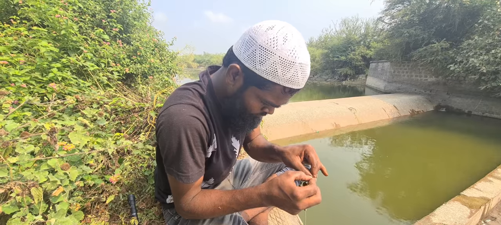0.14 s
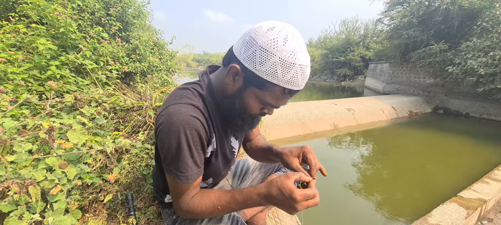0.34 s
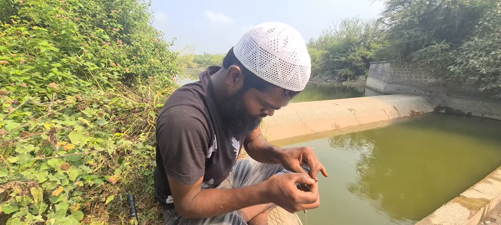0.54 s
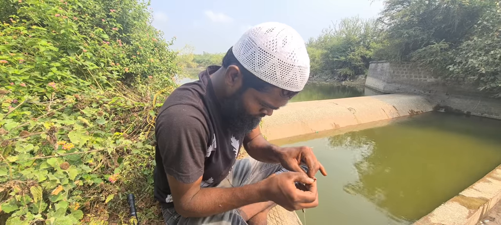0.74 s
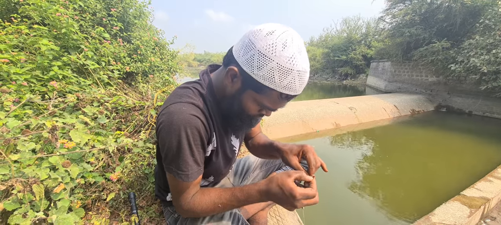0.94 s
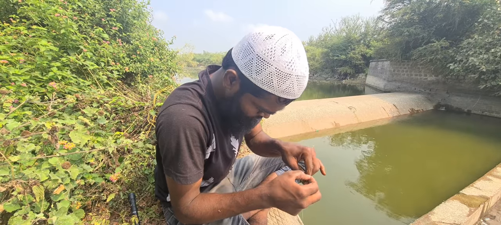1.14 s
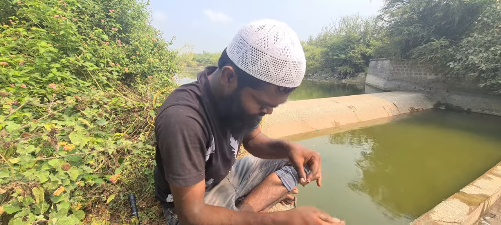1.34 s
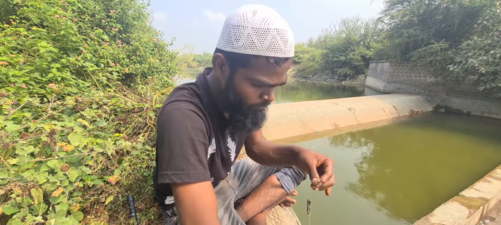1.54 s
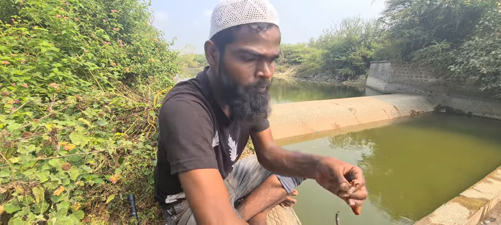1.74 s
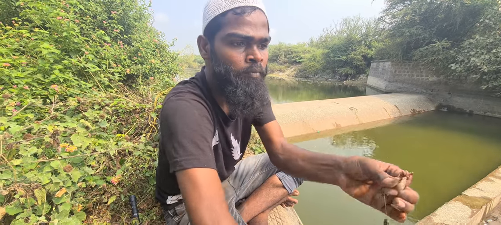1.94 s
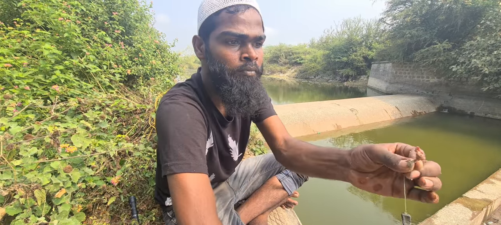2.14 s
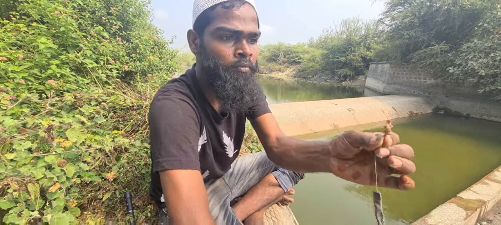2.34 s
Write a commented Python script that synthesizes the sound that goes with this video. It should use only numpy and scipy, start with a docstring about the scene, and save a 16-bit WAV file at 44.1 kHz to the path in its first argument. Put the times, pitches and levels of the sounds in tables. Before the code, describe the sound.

A small bird close by sings quick rising and falling whistles ending on a long, high, quavering note; a farther bird ticks, then gives a fast buzzing trill, echoing off foliage over a soft outdoor rush.

```python
"""Over a soft outdoor rush, a near bird by a canal whistles a quick phrase of rising and falling slurs
that ends in a long, high, quavering note: frequency-modulated sine tones with a light echo.
A farther bird ticks, then trills in see-saw sine sweeps which echoes from the foliage smear into a buzz.
A faint distant whistle is one echoing sine tone; the rush and its thin hiss are filtered noise."""
import sys
import numpy as np
from scipy import signal
from scipy.fft import rfft, irfft
from scipy.io import wavfile
from scipy.ndimage import uniform_filter1d

SR = 44100
rng = np.random.default_rng(int(sys.argv[2]) if len(sys.argv) > 2 else 0)


def inscribe(sig):
    """Save sig as 16-bit PCM at rate SR to the path in sys.argv[1].

    A 1-D sig is mono; a 2-D sig holds one channel per row.
    Samples are clipped to [-1, 1] before scaling.
    """
    pcm = np.round(np.clip(np.atleast_2d(sig).T, -1, 1) * 32767)
    wavfile.write(sys.argv[1], SR, pcm.astype(np.int16))


N = 108045
TIME = np.arange(N) / SR
HZ = np.maximum(np.arange(N // 2 + 1) * SR / N, 1)
NOTE_EDGE_S = .003

# Slowing warble of the near bird's pitch, which widens and then narrows:
# start t/s, end t/s, first rate f/Hz, last rate f/Hz, widest span f/Hz
WARBLE = (.083, .262, 123, 68, 680)


def from_db(db):
    """Level to amplitude: 20 dB is a factor of ten."""
    return 10 ** (np.asarray(db) / 20)


def rms_one(x):
    """Normalisation: division by the root mean square gives unit rms."""
    return x / np.sqrt(np.mean(x ** 2) + 1e-20)


def drift(rate):
    """Low-pass noise: two equal poles at the rate in Hz leave a smooth random signal with spread 1."""
    r = np.exp(-2 * np.pi * rate / SR)
    noise = rng.standard_normal(2 * N)
    settled = signal.lfilter([1], [1, -2 * r, r * r], noise)[N:]
    return rms_one(settled)


def curve(x, points):
    """Linear interpolation: the value at x of a two-column table, held level beyond its ends."""
    return np.interp(x, *np.transpose(points))


def colour(x, points):
    """Spectral filtering: each frequency is weighted by an (f/Hz, level/dB) curve over log frequency."""
    hz, db = np.transpose(points)
    gain = from_db(np.interp(np.log(HZ), np.log(hz), db))
    return irfft(rfft(x) * gain, N)


def gate(start, end, edge):
    """Amplitude windowing: one between start and end, with linear fades over the edge time."""
    return np.clip(np.minimum(TIME - start, end - TIME) / edge + .5, 0, 1)


def foliage(x, t60):
    """Diffuse scattering: leaves and banks return dense echoes that decay 60 dB in t60 s; unit energy."""
    build_s = .008
    t = TIME[:SR]
    echoes = rng.standard_normal(SR) * from_db(-60 * t / t60) * (1 - np.exp(-t / build_s))
    return signal.fftconvolve(x, echoes / np.sqrt(np.sum(echoes ** 2)))[:N]


def air():
    """Broadband noise: a low, almost centred, wavering mid-side rush with a thin centred hiss above it."""
    rush_db, waver_db, waver_hz = -53, 2.01, 7.7
    # Spectrum shape of the low rush: f/Hz, relative level per Hz/dB
    rush_spectrum = [(25, -22), (110, -29), (170, -10), (280, 2), (480, -0.5), (750, -4), (1300, -8),
                     (2200, -17), (3500, -31.5)]
    # Stereo width of the rush: f/Hz, side minus mid level/dB
    side_level = [(70, 3), (125, -2), (250, -22), (500, -20), (1100, -7), (4000, -24)]
    # Spectrum shape of the hiss: f/Hz, relative level per Hz/dB
    hiss_spectrum = [(1200, -8), (2300, -0.5), (4000, -0.5), (7000, 5), (9500, -3.5), (12000, -6),
                     (13500, -25), (15300, -39)]
    # Course of the hiss: t/s, level/dB
    hiss_level = [(0, -50.5), (1.15, -48.5), (2.12, -48.5), (2.3, -52)]

    mid, side, hiss = rng.standard_normal((3, N))
    mid = rms_one(colour(mid, rush_spectrum))
    side = colour(rms_one(colour(side, rush_spectrum)), side_level)
    left_right = np.array([mid + side, mid - side])
    rush = from_db(rush_db + waver_db * drift(waver_hz)) * left_right
    return rush + from_db(curve(TIME, hiss_level)) * rms_one(colour(hiss, hiss_spectrum))


def flutter(start, end, first_rate, last_rate, span):
    """Frequency modulation: a span in Hz that widens then narrows, and the running count of swings."""
    u = np.clip((TIME - start) / (end - start), 0, 1)
    rate = (first_rate + (last_rate - first_rate) * u) * (1 + .025 * drift(20))
    swing_span = span * 2 * np.sqrt(u * (1 - u))
    return swing_span, np.cumsum(rate * (TIME > start)) / SR


def pitch_swings():
    """Modulation waveform, in Hz: the warble is a sine, the quaver a row of arches with pointed dips."""
    jitter_from_s, jitter_spread_hz = 1.128, 148   # the long high note turns unsteady
    # Quaver of the last note: start t/s, end t/s, first rate f/Hz, last rate f/Hz, widest span f/Hz
    quaver_course = (1.2035, 1.43, 46, 46, 1750)

    span, turns = flutter(*WARBLE)
    warble = span / 2 * np.sin(2 * np.pi * turns)
    span, turns = flutter(*quaver_course)
    arches = np.abs(np.sin(np.pi * turns)) - 2 / np.pi   # zero on average
    jitter = jitter_spread_hz * (TIME > jitter_from_s) * drift(133)
    return warble, span * arches + jitter


def near_bird():
    """Instantaneous frequency: its running sum is the phase of whistles that glide, warble and quaver."""
    undertone_db = -31   # an octave down, relative to the long high note
    scatter_db, t60_s = -13.5, .36   # scatter relative to the direct song
    warble_swell_db = 5   # the warble is louder at the top of each swing
    # Notes of the phrase, one curve each, some overlapping as two voices: t/s, f/Hz, level/dB
    phrase = [
        [(.048, 2338, -45.5), (.085, 2900, -39.5), (.11, 2794, -42), (.15, 3445, -34), (.19, 3277, -34),
         (.232, 4060, -27), (.27, 4485, -23), (.285, 4300, -23.5), (.301, 3500, -21.5), (.31, 2560, -48)],
        [(.429, 3393, -32.5), (.433, 4867, -25), (.446, 3020, -36), (.464, 2430, -43.5)],
        [(.456, 5220, -33), (.464, 4420, -33), (.468, 3750, -22.5), (.473, 3280, -36)],
        [(.503, 3090, -42), (.508, 4200, -25), (.514, 5500, -35.5), (.521, 5600, -44)],
        [(.52, 2543, -49), (.54, 3450, -30), (.555, 4134, -20.5), (.58, 4670, -19.5), (.609, 5110, -20.5),
         (.616, 5250, -33.5), (.628, 5120, -24.5), (.635, 4400, -22), (.642, 3270, -46)],
        [(.687, 6900, -24), (.689, 5400, -23), (.692, 3700, -27.5)],
        [(.698, 6700, -28), (.703, 5740, -23.5), (.709, 4780, -18), (.72, 4280, -22.5), (.732, 3865, -31.5),
         (.741, 3250, -42)],
        [(.836, 7400, -40), (.839, 5750, -29.5), (.845, 7700, -35)],
        [(.842, 4570, -43), (.852, 6380, -34), (.879, 6910, -27), (.903, 6890, -33.5)],
        [(.862, 8900, -47), (.885, 8680, -36.5), (.903, 8900, -35), (.913, 7400, -34)],
        [(.929, 4230, -35.5), (.933, 6160, -26), (.938, 8300, -29), (.944, 8900, -32), (.954, 8100, -27.5),
         (.961, 7100, -25.5), (.973, 5900, -24.5), (.984, 5240, -26)],
        [(1.034, 5960, -28), (1.039, 7700, -30), (1.042, 6160, -27.5), (1.048, 8400, -30), (1.066, 9300, -42)],
        [(1.076, 9400, -30), (1.081, 6610, -24), (1.092, 8390, -36), (1.1, 7780, -26), (1.122, 7380, -23.5),
         (1.139, 6980, -28), (1.159, 7470, -24), (1.167, 6825, -30), (1.203, 7330, -27), (1.25, 6990, -30),
         (1.31, 6460, -33), (1.42, 6970, -29)],
    ]
    # High notes flicker more: f/Hz, level spread/dB
    shimmer_spread = [(5200, .8), (6800, 2.3)]
    # Soft notes waver more: level/dB, pitch spread f/Hz
    waver_spread = [(-40, 55), (-28, 22)]

    warble, quaver = pitch_swings()
    waver, flicker = drift(300), drift(300)
    swell = warble_swell_db * 2 * warble / WARBLE[4]
    song = np.zeros(N)
    for k, note in enumerate(phrase):
        s, hz, db = np.transpose(note)
        glide = uniform_filter1d(np.interp(TIME, s, hz), size=100)   # rounds the corners
        level = np.interp(TIME, s, db)
        pitch = glide + warble + quaver + waver * curve(level, waver_spread)
        phase = 2 * np.pi * np.cumsum(pitch) / SR
        shimmer = flicker * curve(glide, shimmer_spread)
        voice = np.sin(phase)
        if k == len(phrase) - 1:
            voice += from_db(undertone_db) * np.sin(phase / 2)
        loudness = np.sqrt(2) * from_db(level + shimmer + swell)   # root 2: rms to peak of a sine
        song += voice * loudness * gate(s[0], s[-1], NOTE_EDGE_S)
    return song + from_db(scatter_db) * foliage(song, t60_s)


def sweeps(rows, length, to_hz):
    """Chirps: one roughened glide per row (t/s, level/dB, start f/Hz) under a half-sine envelope."""
    bend = 0.74   # under 1: a sweep starts fast and slows
    rough_hz = 110   # spread of the unsteady pitch
    out = np.zeros(N + SR)
    u = np.linspace(0, 1, int(length * SR))
    unsteady = rough_hz * drift(426)
    for s, db, from_hz in rows:
        glide = from_hz + (to_hz - from_hz) * u ** bend
        i = int(np.clip(s * SR, 0, N - len(u)))
        phase = 2 * np.pi * np.cumsum(glide + unsteady[i:i + len(u)]) / SR
        envelope = np.sqrt(2) * from_db(db) * np.sin(np.pi * u)
        out[i:i + len(u)] += envelope * np.sin(phase)
    return out[:N]


def far_bird():
    """Direct and scattered paths: ticks, then a trill of up- and down-strokes, heard largely as echoes."""
    tick_db, tick_s, tick_from_hz, tick_to_hz = -34.5, .015, 3820, 8900
    trill_start_s, trill_period_s = 1.0765, .0612
    trill_slowing_s = .00068   # each gap is longer than the last by this much
    down_s, down_from_hz, down_to_hz = 0.019, 9450, 6380
    up_lead_s, up_s, up_to_hz = .027, 0.022, 7370
    up_db = 0.5   # relative to the down-stroke
    up_first_hz, up_last_hz = 5060, 4300   # the up-strokes start ever lower
    tick_scatter_db, tick_t60_s = 2.5, 0.5   # scatter gains ahead of the echo colour
    trill_scatter_db, trill_t60_s = 1.5, 0.44
    # Onsets of the ticks, each a fast upward sweep: t/s
    tick_times = [.06, .19, .31, .427, .539, .648, .758, .87, .99]
    # Stroke level along the trill, ahead of the path colours: t/s, level/dB
    trill_level = [(1.08, -30), (1.33, -28.5), (1.5, -27.5), (1.9, -27.5), (2.12, -27)]
    # Colour of the direct path: f/Hz, level/dB
    direct_colour = [(5000, -9.5), (5700, -9), (7000, -1.5), (8400, -4.5), (8900, -11)]
    # Colour of the echoes: f/Hz, level/dB
    echo_colour = [(4600, 3.5), (5470, -16.5), (5750, 1), (6750, 1.5), (7400, -2), (8400, -4), (8650, -7)]

    k = np.arange(17)   # stroke pairs
    times = trill_start_s + trill_period_s * k + trill_slowing_s * k * (k - 1) / 2
    levels = curve(times, trill_level)
    tick_rows = [(s, tick_db, tick_from_hz) for s in tick_times]
    down_rows = [(s, db, down_from_hz) for s, db in zip(times, levels)]
    up_starts_hz = np.linspace(up_first_hz, up_last_hz, len(k))
    up_rows = zip(times - up_lead_s, levels + up_db, up_starts_hz)

    ticks = sweeps(tick_rows, tick_s, tick_to_hz)
    down = sweeps(down_rows, down_s, down_to_hz)
    trill = sweeps(up_rows, up_s, up_to_hz) + down
    echoes = from_db(tick_scatter_db) * foliage(ticks, tick_t60_s)
    echoes += from_db(trill_scatter_db) * foliage(trill, trill_t60_s)
    return colour(ticks + trill, direct_colour) + colour(echoes, echo_colour)


def distant_whistler():
    """Reverberation: one faint sine tone, gliding slightly, is blurred by a strong dense echo."""
    echo_db, t60_s = -3.5, 0.83   # echo relative to the direct note
    # Course of the whistle: t/s, f/Hz, peak level/dB
    whistle_course = [(0.421, 2647, -47), (0.453, 2833, -35), (0.482, 2640, -60), (0.719, 2733, -56)]

    s, hz, db = np.transpose(whistle_course)
    tone = np.sin(2 * np.pi * np.cumsum(np.interp(TIME, s, hz)) / SR)
    note = tone * from_db(np.interp(TIME, s, db)) * gate(s[0], s[-1], NOTE_EDGE_S)
    return note + from_db(echo_db) * foliage(note, t60_s)


def scene():
    """Superposition: the birds and whistle, straight ahead, add to the outdoor air."""
    return near_bird() + far_bird() + distant_whistler() + air()


def record(dry):
    """Low-pass filtering: a steep cut leaves everything above 16 kHz at least 70 dB down."""
    return signal.sosfilt(signal.cheby2(12, 70, 16000, fs=SR, output="sos"), dry)


dry = scene()
out = record(dry)
inscribe(out)
```